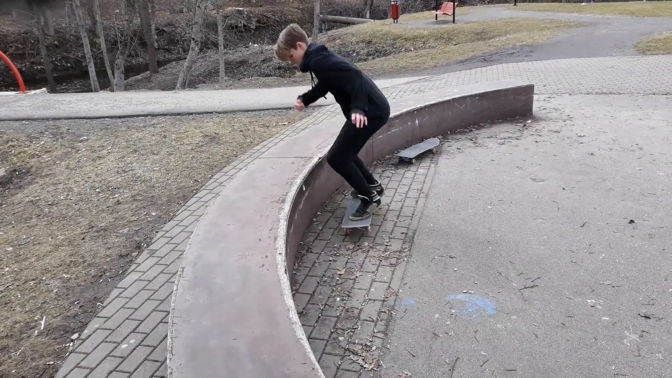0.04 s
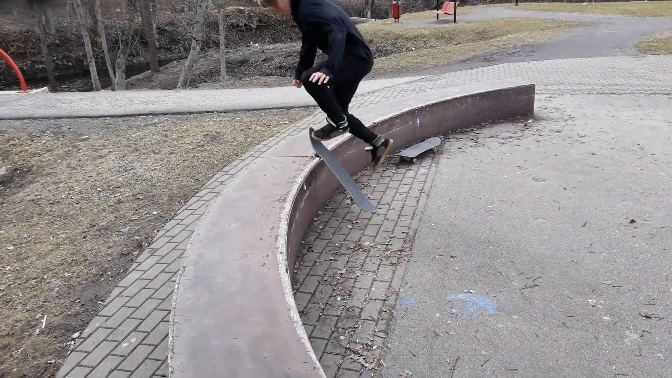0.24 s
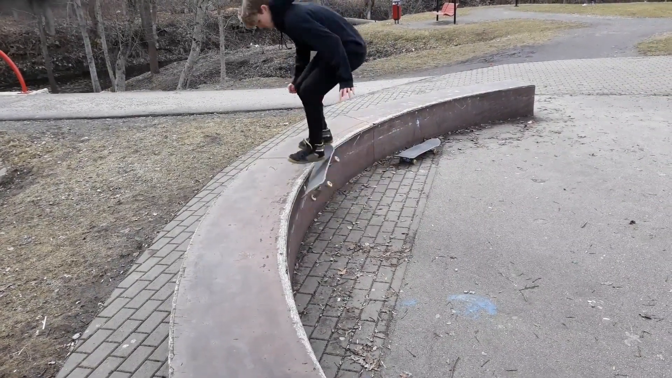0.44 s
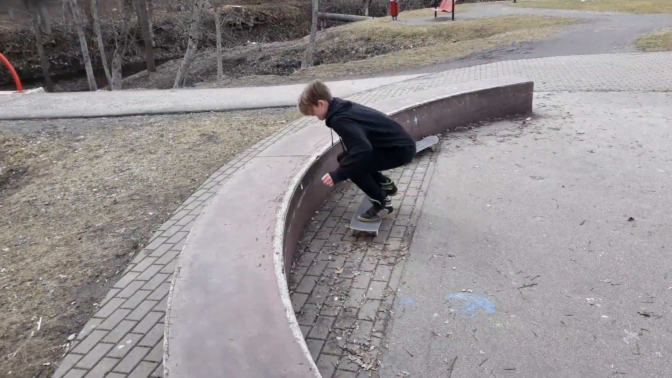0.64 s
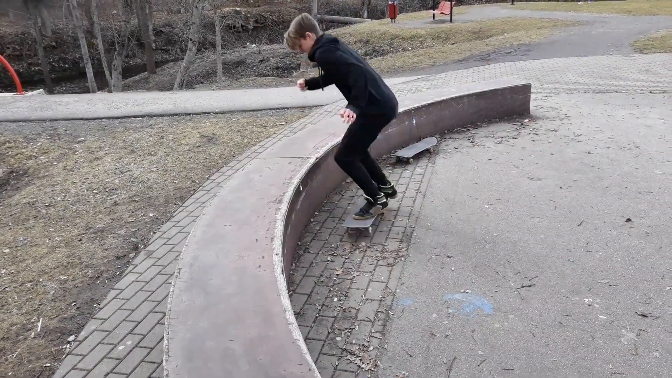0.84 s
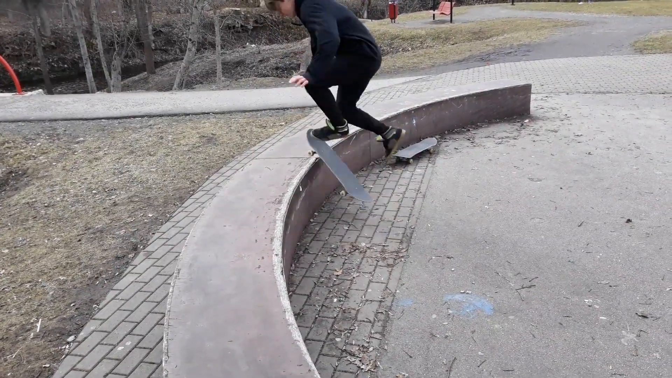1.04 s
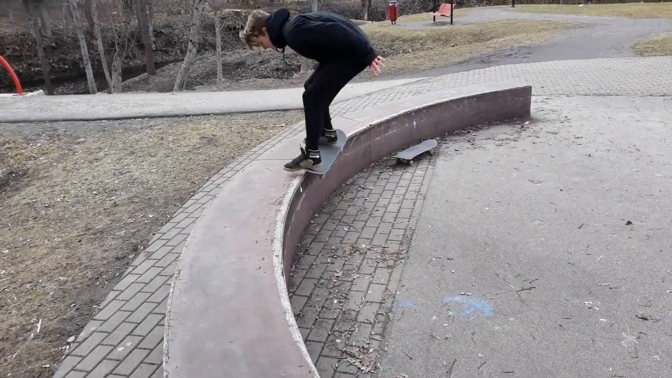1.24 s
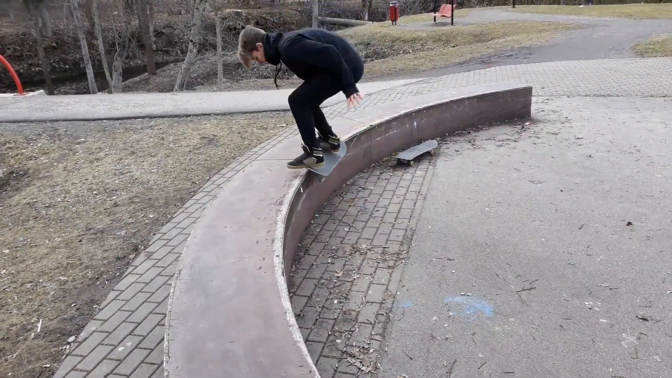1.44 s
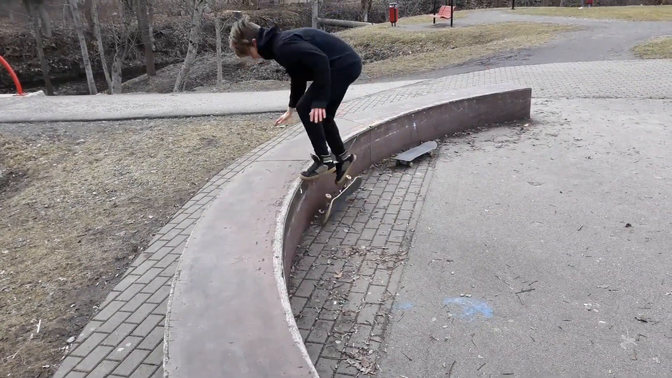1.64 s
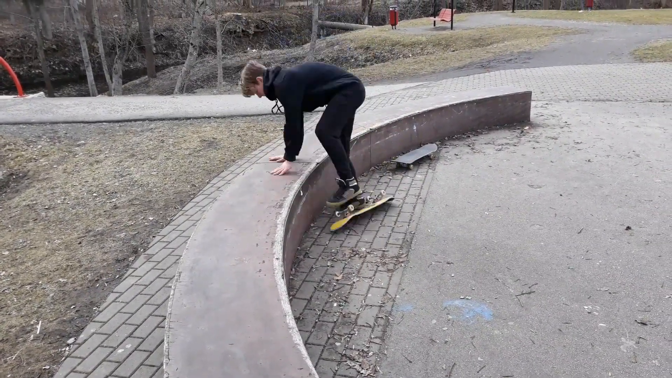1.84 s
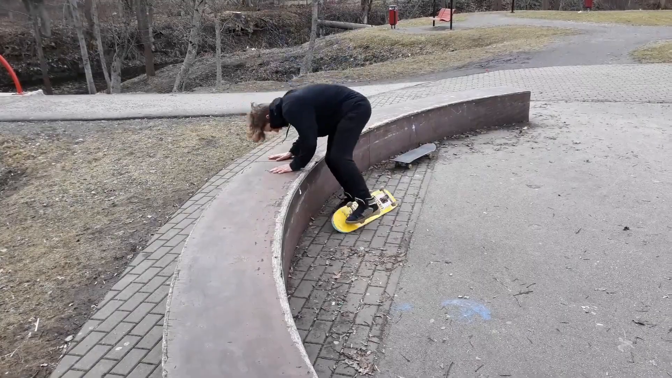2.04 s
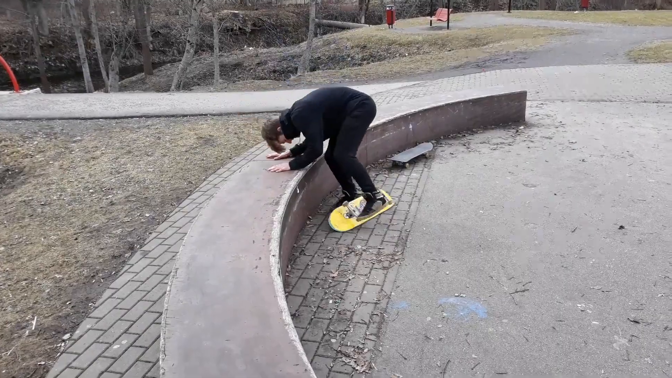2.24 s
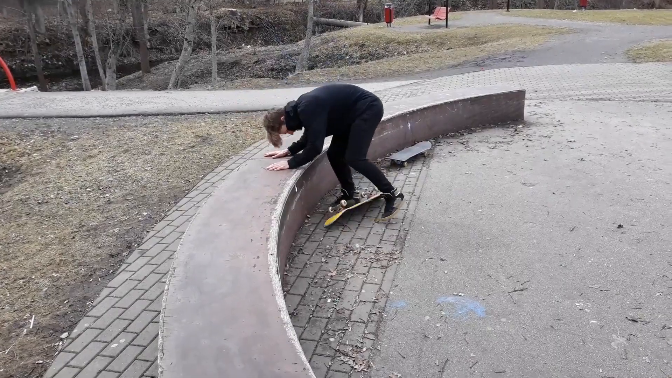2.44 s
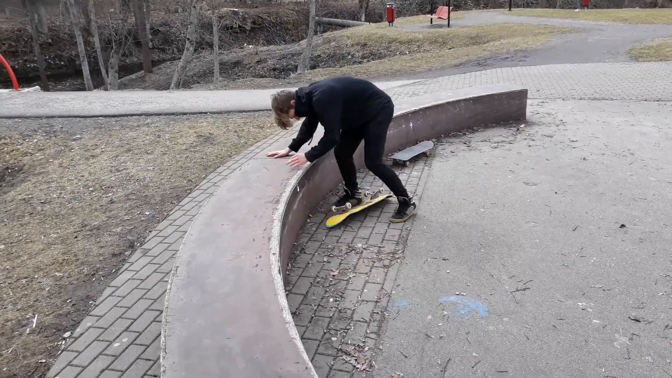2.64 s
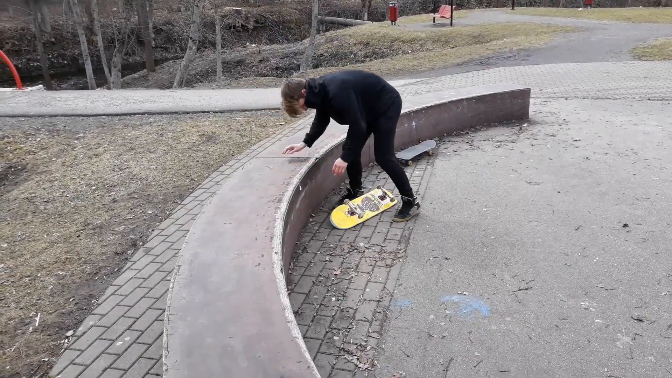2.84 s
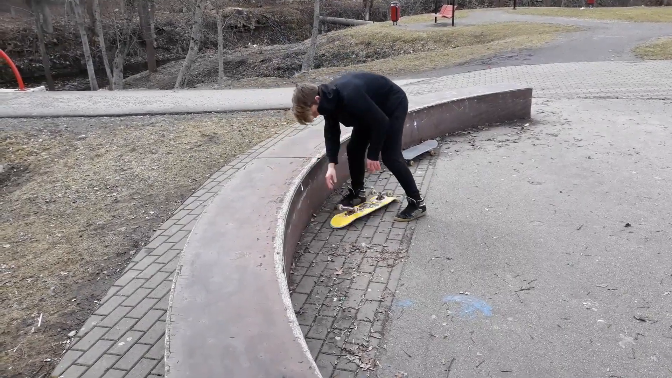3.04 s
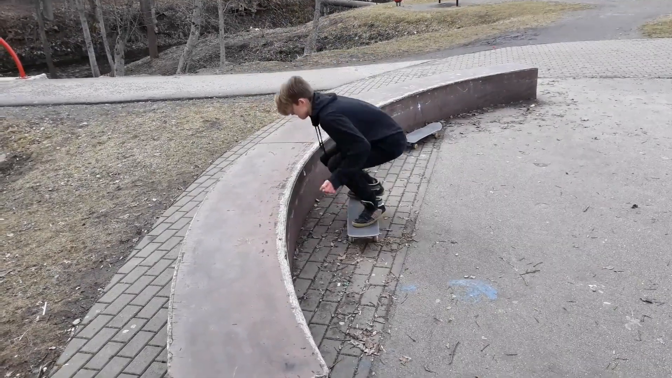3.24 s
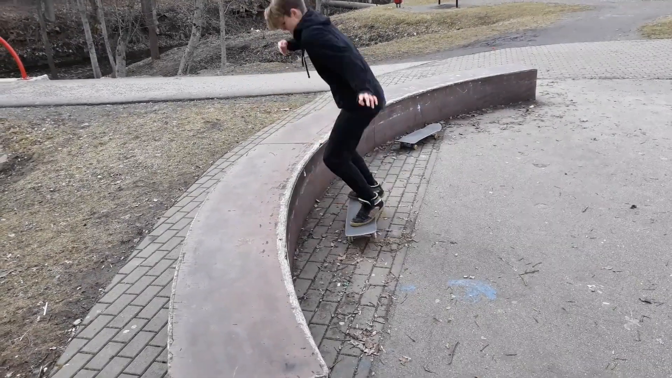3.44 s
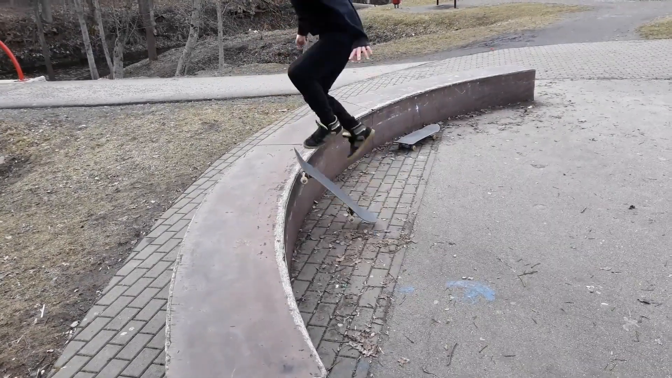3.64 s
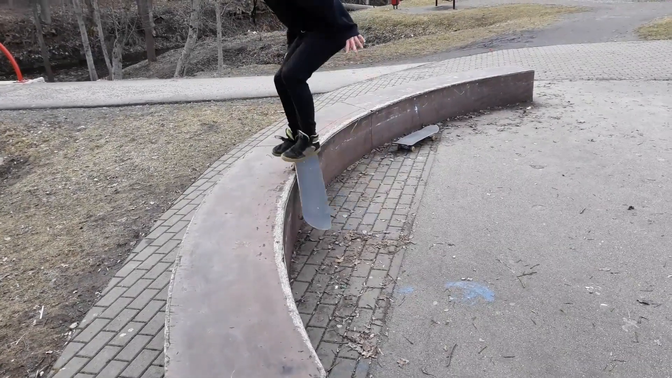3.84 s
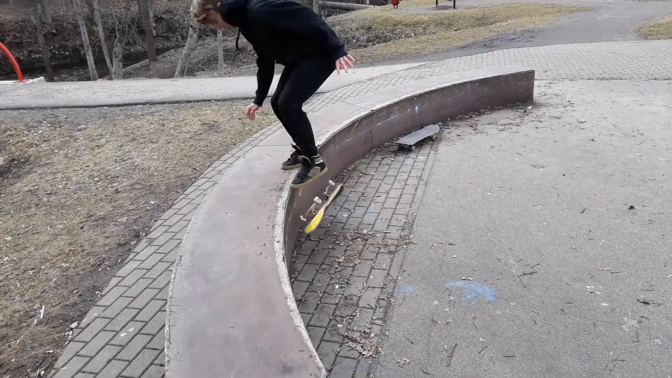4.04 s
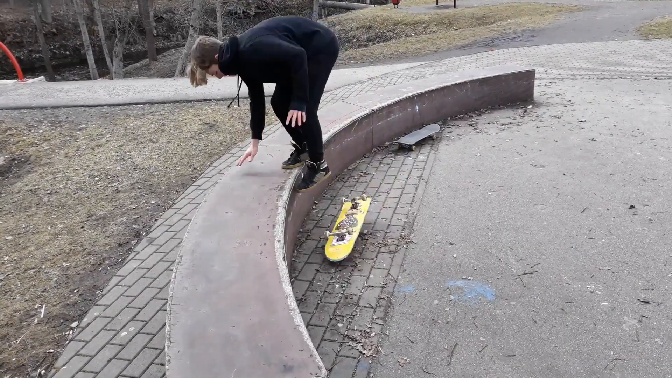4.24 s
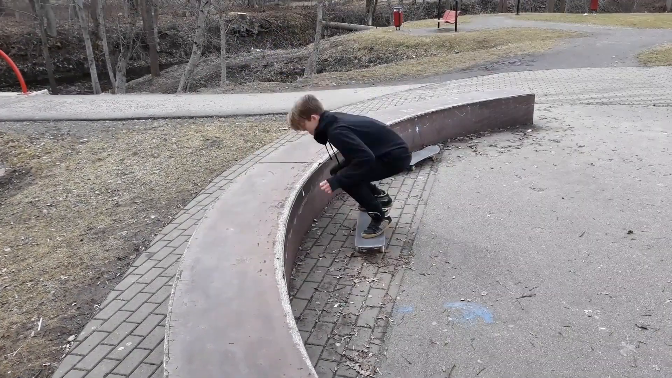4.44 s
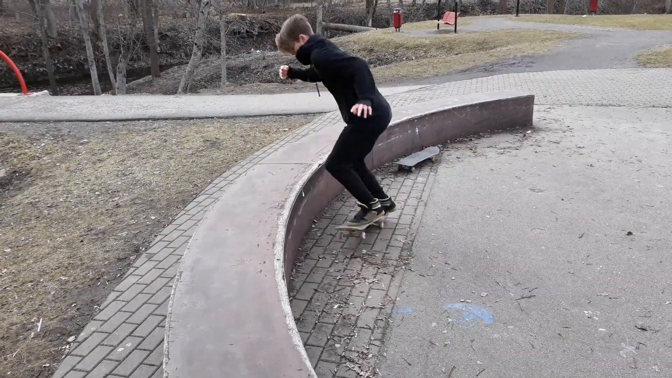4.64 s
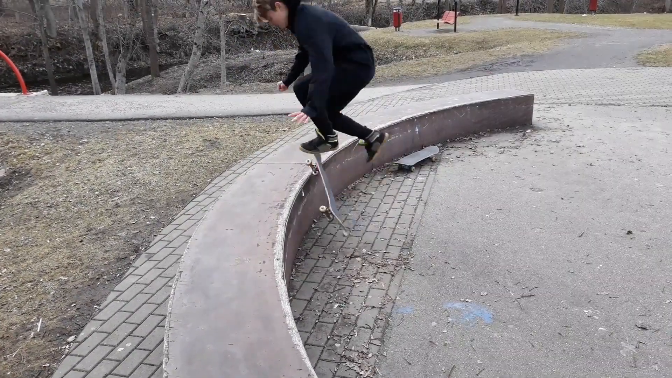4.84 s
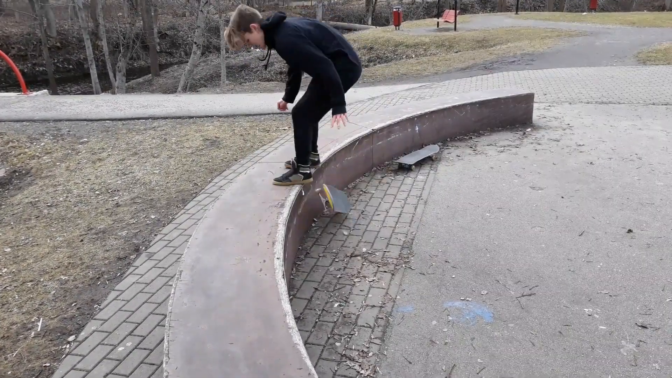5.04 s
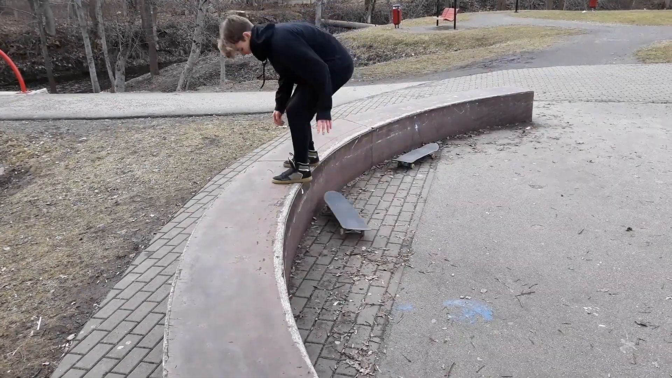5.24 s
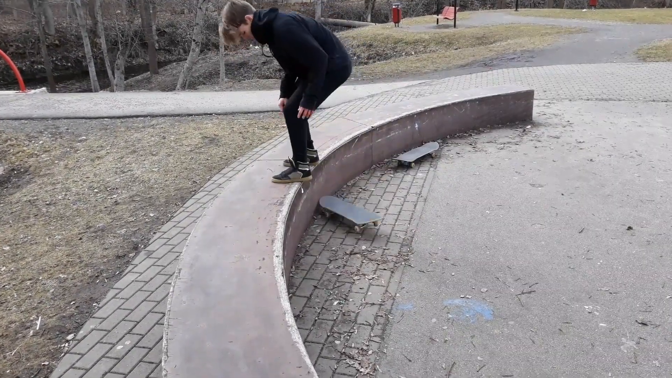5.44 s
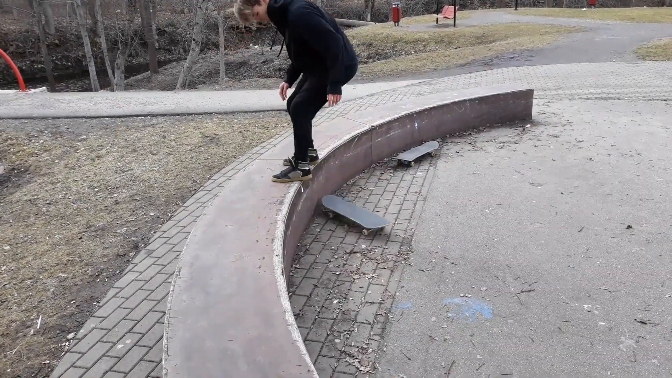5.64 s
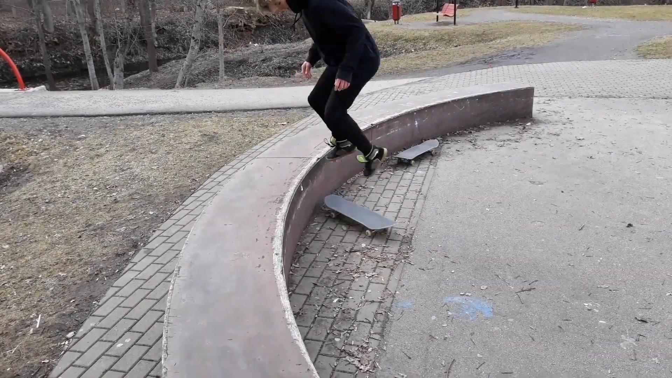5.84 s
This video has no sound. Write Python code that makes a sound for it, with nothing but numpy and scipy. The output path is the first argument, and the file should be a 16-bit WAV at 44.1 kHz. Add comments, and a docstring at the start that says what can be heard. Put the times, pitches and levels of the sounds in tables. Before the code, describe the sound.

A skateboard knocks against a concrete ledge and paving, fairly close, with a slight short echo over soft outdoor air. The tail cracks at 0.3 seconds, and a hollow, rattling landing at 0.6 cuts off abruptly. A gritty scuff leads into another sharp pop at 1.1, followed by wooden knocks and scrapes. A shoe squeaks briefly at 1.6, then the deck thuds, cracks and slams down loudly at about 2 seconds. The air drops away, leaving only faint taps, and returns at 3.1 with light scuffs. A pop at 3.7 starts a second burst, with deck thuds, scrapes and a loud ringing clatter around 4.3. A short, faint creak at 4.6 precedes another pop at 4.8 and heavy hollow knocks until 5.2. The board then settles in weakening taps and small metal rattles until about 5.8 seconds.

```python
"""Skateboard on a concrete ledge

A board is popped against a curved ledge several times, over the outdoor air of a park.
Impacts of tail, trucks and wheels excite short resonances (cracks) and the bending modes of the
plywood deck (booms), and shake loose hardware. Friction makes the soles scuff and squeak,
the wheels skid and a bushing creak. Wall and paving scatter a brief echo."""
import sys
import numpy as np
from scipy import signal
from scipy.fft import rfft, irfft
from scipy.io import wavfile
from scipy.ndimage import uniform_filter1d, minimum_filter1d

SR = 44100
rng = np.random.default_rng(int(sys.argv[2]) if len(sys.argv) > 2 else 0)


def waveform_to_disk(signal):
    """Save audio, clipped to [-1, 1], as 16-bit WAV at the path in sys.argv[1]."""
    frames = np.transpose(np.atleast_2d(signal))
    scaled = np.clip(frames, -1, 1) * 32767
    samples = np.round(scaled).astype(np.int16)
    wavfile.write(sys.argv[1], SR, samples)


N = 260631
CUTOFF_S = .648  # everything that sounds before here stops abruptly

# Hard contacts with the concrete. Each row: start in seconds, level in dB, clearest ring in Hz,
# treble lift above 4 kHz in dB, chatter t60 in seconds.
CONTACTS = [(.273, -1, 2100, -6, .055), (.283, -9, 1450, 26, .05), (.312, -4, 1250, 3, .035),
            (.576, -11, 1340, 5, .07), (.587, -4, 1350, 14, .06), (.614, -15, 1310, 11, .1),
            (1.061, 1.5, 1400, 17, .066), (1.093, -13, 1990, 3, .04), (1.126, -11, 1250, 9, .17),
            (1.307, -11, 1410, -6, .085), (1.344, -15, 1450, -3, .054), (1.353, -14, 1230, 12, .14),
            (1.398, -10, 1340, -8, .022), (1.53, -22, 1400, -10, .025), (1.643, -7, 1080, 11, .066),
            (1.712, -15, 1450, 6, .027), (1.751, 0, 2070, -30, .12), (1.764, -10, 1920, -13, .03),
            (1.842, -17, 1200, -16, .035), (1.868, -30, 3900, 14, .03), (1.926, -22, 1990, 4, .08),
            (1.948, -24, 3000, 4, .05), (1.964, 1.5, 1965, 0, .045), (1.986, -7, 1960, -2.5, .05),
            (2.02, -7, 1970, -12, .05), (2.054, -13, 1890, -9, .033), (2.073, -17, 1140, -5, .09),
            (2.461, -39, 1360, 3, .17), (2.493, -36, 1055, 8, .1), (2.539, -27, 2000, -3, .024),
            (2.833, -30, 1100, 6, .05), (3.122, -24, 1870, 7, .02), (3.668, -16, 1160, 13, .04),
            (3.709, -4, 1900, 9, .07), (3.808, -9, 800, 14, .05), (3.973, -9, 1220, -4, .12),
            (4.017, -11, 1400, 5, .06), (4.033, -8, 1370, -2, .12), (4.084, -1.5, 1990, -12, .04),
            (4.231, -7, 1475, -3, .14), (4.236, -5, 1060, -14, .04), (4.266, 2.5, 2040, 4, .1),
            (4.275, -5, 1890, 0, .05), (4.291, -5, 2010, -3, .085), (4.445, -15, 1760, -6, .09),
            (4.819, .6, 1940, -4, .04), (4.829, -7, 4200, 14, .03), (4.893, -4, 1700, 5, .11),
            (5.029, -3, 1470, 3, .15), (5.117, -16, 1400, 0, .034), (5.147, -16, 1270, -15, .05),
            (5.159, -16, 3780, 0, .02), (5.183, -3, 1220, 14, .045), (5.314, -11, 1890, -6, .045),
            (5.334, -15, 1380, -12, .04), (5.357, -10, 1420, -3, .04), (5.403, -20, 1405, 6, .03),
            (5.452, -28, 1400, 16, .06), (5.509, -17, 1325, 0, .06), (5.604, -22, 1320, 9, .13),
            (5.718, -26, 1300, 14, .085), (5.792, -29, 1360, 14, .074)]


def amp(db):
    return 10 ** (np.asarray(db) / 20)


def unit_rms(x):
    return x / np.sqrt(np.mean(x ** 2) + 1e-20)


def add(mix, start, sound):
    """Superposition: mixes a sound in; one begun before CUTOFF_S cannot ring past it."""
    if start < CUTOFF_S:
        sound = sound[:round((CUTOFF_S - start) * SR)]
    part = mix[round(start * SR):][:len(sound)]
    part += sound[:len(part)]


def park_air():
    """Spectrally shaped noise with faint random patches; level and rumble change in steps."""
    # Spectrum of the air. Each row: frequency in Hz, relative spectral density in dB.
    spectrum = [(24, -49.5), (40, -13), (85, -2.5), (292, -0.5), (1050, -7.5), (1830, -3), (2540, -15),
                (3430, -11.5), (5140, -25.5), (6280, -25), (8700, -30), (11000, -45), (15200, -48.5),
                (16300, -66)]
    # Steps in the air. Each row: start in seconds, level in dB, rumble lift in dB.
    steps = [(0, -40, -2), (.648, -41.5, 0), (2.0, -57.5, 0), (3.114, -40.5, 0), (4.48, -39.5, 2),
             (5.2, -48, 0)]
    frames, hz = N // 256 + 5, np.fft.rfftfreq(1024, 1 / SR)
    real, imag, patches = rng.standard_normal((frames, 513, 3)).T
    patch_db = unit_rms(uniform_filter1d(uniform_filter1d(patches, 12, 0), 14, 1))
    knot_hz, knot_db = np.transpose(spectrum)
    shape_db = np.interp(np.log(hz + 1), np.log(knot_hz), knot_db)
    spectra = (real + 1j * imag) * amp(shape_db[:, None] + patch_db)
    starts, level_db, rumble_db = np.transpose(steps)
    frame_step = np.searchsorted(starts[1:], np.arange(frames) * 256 / SR)
    spectra *= amp(rumble_db[frame_step] / (1 + (hz[:, None] / 300) ** 2))
    noise = signal.istft(spectra, nperseg=1024, noverlap=768)[1][:N]
    step = np.searchsorted(starts, np.arange(N) / SR, "right") - 1
    return amp(level_db[step]) * unit_rms(noise)


def ledge_echo(sound, t60=.28):
    """Scattering off the curved wall and paving: sparse reflections whose treble dies first."""
    taps = np.zeros(SR // 2)
    slots = np.arange(300, len(taps) - 20, 20)
    taps[slots + rng.integers(0, 20, len(slots))] = rng.choice([-1., 1.], len(slots))
    hz, t, spectra = signal.stft(taps, SR, nperseg=256)
    decay = amp(-60 * t / t60 * (.5 + hz[:, None] / 5000))  # t60 holds at 2.5 kHz
    tail = signal.istft(spectra * decay * (hz[:, None] > 0), SR, nperseg=256)[1]
    return signal.fftconvolve(sound, tail / np.linalg.norm(tail))[:N]


def hardware_rattles(t60=.15, ticks_per_s=350):
    """Repeated collisions: loose washers and bearings tick over a thin fizz, then settle."""
    # Shakes from blows to the board. Each row: start in seconds, level in dB.
    shakes = [(.587, -39), (1.128, -46), (1.31, -46), (1.396, -51), (1.77, -46), (3.636, -50), (3.808, -44),
              (4.3, -44), (4.9, -45), (5.04, -46), (5.19, -46), (5.333, -51), (5.357, -49), (5.403, -46),
              (5.604, -52), (5.718, -52), (5.79, -57)]
    # Resonances of the metal. Each row: frequency in Hz, width in Hz, gain in dB.
    metal_modes = [(6500, 1800, 0), (8600, 1400, -1), (11000, 3000, -16), (15300, 1100, -15)]
    out, t = np.zeros(N), np.arange(8192) / SR
    hz = np.fft.rfftfreq(len(t), 1 / SR)
    mode_hz, width, mode_db = np.transpose(metal_modes)[:, :, None]
    metal = (amp(mode_db) / (1 + 2j * (hz - mode_hz) / width) ** 2).sum(0)
    settle = amp(-60 * t / t60) * (.8 + .7 * np.exp(-t / .006))
    for start, db in shakes:
        ticks = rng.standard_normal(len(t)) * (.11 + (rng.random(len(t)) < ticks_per_s / SR))
        add(out, start, amp(db) * settle * unit_rms(irfft(rfft(ticks) * metal)))
    return out


def ring_response(hz, centre_hz, treble_db, spread_db):
    """Damped resonators in parallel; low ones weaken with distance from the contact's favoured pitch."""
    # Short rings of ply, trucks and kerb. Each row: frequency in Hz, bandwidth in Hz, gain in dB.
    resonances = [(775, 203, 2.5), (1030, 110, 2.5), (1251, 218, -0.5), (1565, 213, -3.5), (1862, 172, 0),
                  (2135, 274, 0), (3090, 650, -9.5), (3740, 484, -13), (4184, 474, -20), (5500, 850, -23.5),
                  (6340, 1700, -29.5), (8760, 780, -31.5), (11500, 3000, -57.5), (15200, 1200, -72.5)]
    mode_hz, width, db = np.transpose(resonances)
    near_db = -7.5 * np.log2(np.minimum(mode_hz, 2500) / np.minimum(centre_hz, 2500)) ** 2
    db = db + near_db + treble_db * np.clip(np.log2(mode_hz / 2000), 0, 1) + spread_db
    signs = (-1) ** np.arange(len(mode_hz))
    modes = (signs * amp(db))[:, None] / (1 + 2j * (hz - mode_hz[:, None]) / width[:, None])
    return modes.sum(0) / (1 + 400 / (1j * hz + 1)) / (1 + 1j * hz / 8200) ** 2


def scrapes(swell_share=.4):
    """Sliding friction: dense grit clicks of uneven size drive the short rings, swelling and fading."""
    # Soles rasping on grip tape and wheels skidding. Each row: start and length in seconds,
    # level and brightness in dB.
    slides = [(.505, .06, -36, 3), (.92, .13, -33, 8), (.99, .058, -25, 12), (1.09, .2, -42, -5),
              (1.31, .11, -31, 6), (1.76, .25, -36, -9), (1.97, .28, -46, 3), (3.29, .1, -43, 18),
              (3.5, .14, -44, 18), (3.94, .09, -27, 7), (4.02, .09, -26, 15), (4.27, .16, -27, 1.5),
              (4.7, .07, -37, 15), (4.76, .07, -25, 13), (5.187, .13, -34, -5.5), (5.31, .2, -40, -5)]
    out, size = np.zeros(N), 16384
    hz, t = np.fft.rfftfreq(size, 1 / SR), np.arange(size) / SR
    for start, length, db, bright_db in slides:
        grit = rng.standard_normal(size) * amp(3 * np.minimum(rng.exponential(1, size), 4))
        grit *= rng.random(size) < .2
        grip = unit_rms(uniform_filter1d(rng.standard_normal(size), size=200))  # catches and lets go
        body = ring_response(hz, 1700 * 2 ** (bright_db / 15), bright_db, 0)
        rasp = unit_rms(irfft(rfft(grit * amp(2.5 * grip)) * body))
        swell = np.interp(t / length, [0, swell_share, 1], [0, 1, 0]) ** 1.22
        add(out, start, amp(db) * rasp * swell)
    return out


def stick_slip(length, first_hz, last_hz, db, harmonics_db, wobble):
    """Stick-slip oscillation: a gliding harmonic series, unsteady in pitch and strength."""
    count = round(length * SR)
    drifts = uniform_filter1d(uniform_filter1d(rng.standard_normal((2, SR // 4)), size=120), size=60)
    shake, grip = (unit_rms(drift)[:count] for drift in drifts)
    cycles = np.cumsum(np.linspace(first_hz, last_hz, count) * (1 + wobble * shake)) / SR
    tone = sum(gain * np.cos(2 * np.pi * k * cycles) for k, gain in enumerate(amp(harmonics_db), 1))
    return amp(db + 1.5 * grip) * unit_rms(tone) * signal.windows.tukey(count, .45)


def squeaks_and_creak():
    """Stick-slip friction in rubber: soles squeak and a loaded bushing creaks."""
    # Sole slips. Each row: start and length in seconds, first and last pitch in Hz, level in dB.
    slips = [(.512, .03, 1430, 1425, -37), (1.571, .027, 890, 950, -20), (1.595, .024, 965, 1005, -20),
             (1.618, .03, 1000, 1050, -27), (3.01, .06, 822, 850, -51), (3.3, .07, 860, 890, -45)]
    # Relative levels of a squeak's harmonics in dB, from the fundamental up.
    harmonics_db = [0, 11, -7, -6, -16, -27]
    # One slip of the bushing, with the same columns as a sole slip.
    creak = (4.605, .105, 194, 345, -35)
    out = np.zeros(N)
    for start, *slip in slips:
        add(out, start, stick_slip(*slip, harmonics_db, wobble=.02))
    add(out, creak[0], stick_slip(*creak[1:], harmonics_db=[0, -18], wobble=.01))
    return out


def deck_notes():
    """Free vibration: after some blows a single deck mode rings on as a damped sinusoid."""
    # Clear notes. Each row: start in seconds, frequency in Hz, level in dB, t60 in seconds.
    notes = [(3.71, 1217, -13, .05), (4.267, 3230, -11, .04), (4.276, 1040, -8, .075),
             (4.276, 1580, -11, .09), (4.82, 1065, -11, .04), (5.187, 990, -16, .12)]
    out, t = np.zeros(N), np.arange(8192) / SR
    for start, hz, db, t60 in notes:
        add(out, start, amp(db - 60 * t / t60) * np.sin(2 * np.pi * hz * t) * np.minimum(t / .002, 1))
    return out


def deck_booms(damping=1.5, knock_db=-18, knock_tilt_db=6):
    """Modal vibration: a blow bends the deck, and where it lands favours the low or the high modes."""
    # Soft blows. Each row: start in seconds, level in dB, tilt up to 400 Hz in dB per octave.
    blows = [(.309, -2.5, -2.5), (.575, -8, -2), (.583, 0, 1.5), (1.126, -3, 5), (1.3, -7.5, -1),
             (1.343, -12.5, -2.5), (1.643, -1, -1), (1.664, -4.5, -1), (1.709, -19, -4), (3.662, -17, -3),
             (3.728, -18, -11), (3.804, -14, -1), (3.828, -18, -12), (3.945, -14, -12), (4.017, -3, -9),
             (4.04, -12, 0), (4.094, -1.5, -1.5), (4.229, -16, 9.5), (4.285, -14, 7), (4.764, -21, 6),
             (4.893, -.6, -2), (4.909, -4.5, 4), (4.922, -12.5, 1.5), (5.029, -.6, 1.5), (5.044, -11, 3.5),
             (5.064, 0, 1.5), (5.116, -9.5, -7.5), (5.508, -14, 1.5)]
    # Bending modes. Each row: frequency in Hz, gain in dB, t60 of the free deck in seconds.
    bending_modes = [(94.5, -20, 0.26), (136.7, -8, 0.29), (168.7, 2.5, 0.14), (211, 0.5, 0.14),
                     (262.7, 3.5, 0.13), (312.5, 8.5, 0.092), (384.7, -3, 0.13), (527.6, -23, 0.092),
                     (718, -25.5, 0.083)]
    out, t = np.zeros(N), np.arange(14000) / SR
    hz, mode_db, free_t60 = np.transpose(bending_modes)[:, :, None]
    decay_db = 60 * t * damping / free_t60  # ground and feet shorten the ring
    knocks = [(start, db + knock_db, knock_tilt_db) for start, db, *_ in CONTACTS]
    for start, db, tilt_db in blows + knocks:
        spot_db = tilt_db * np.log2(np.minimum(hz, 400) / 250)
        spot_db += 2 * rng.standard_normal(hz.shape)  # no two blows land on the same spot
        detune = 1 + .012 * rng.standard_normal(hz.shape)
        boom = (amp(mode_db + spot_db - decay_db) * np.sin(2 * np.pi * hz * detune * t)).sum(0)
        boom *= (1 - np.exp(-t / .0044)) * (1 + .91 * np.exp(-t / .024))  # the first swings are strong, then quickly fall back to the ring
        add(out, start + .004, amp(db) * boom / abs(boom).max())
    # A narrow deck radiates little deep bass.
    return signal.sosfilt(signal.butter(2, 95, "high", fs=SR, output="sos"), out)


def air_thump():
    """Air displacement: the board slams flat and pushes out one low pressure pulse."""
    # The pulse: start in seconds, level in dB, frequency in Hz, width in seconds.
    pulse = (1.964, -14, 85, .004)
    start, db, hz, width = pulse
    out, t = np.zeros(N), np.arange(14000) / SR
    add(out, start, amp(db) * np.sin(2 * np.pi * hz * t) * t / width * np.exp(1 - t / width))
    return out


def contact_cracks():
    """Impact excitation: a snap and the chatter of crushed grit drive the rings and one woody note."""
    out, t = np.zeros(N), np.arange(8192) / SR
    hz = np.fft.rfftfreq(len(t), 1 / SR)
    snap = 1.1 * amp(-60 * t / .012)
    for start, db, ring_hz, treble_db, t60 in CONTACTS:
        chatter = rng.standard_normal(len(t)) * amp(3.5 * rng.standard_normal(len(t)))
        chatter *= (amp(-60 * t / t60) + snap) * np.minimum(t / .001, 1)
        note = amp(4.5) / (1 + 2j * (hz - ring_hz) / (.027 * ring_hz)) / (1 + (hz / 5000) ** 2)
        spread_db = 2.13 * rng.standard_normal(14)  # one gain offset for each short ring
        body = ring_response(hz, ring_hz, treble_db, spread_db)
        crack = irfft(rfft(chatter) * (body + note) / (1 + 1j * hz / 13000))[:-400]
        peak_power = uniform_filter1d(crack ** 2, size=200).max()
        add(out, start, amp(db) * crack / np.sqrt(6.5 * peak_power))
    return out


def scene():
    """Superposition of direct sound, echo and air; the first echo also stops at CUTOFF_S."""
    board = contact_cracks() + deck_booms() + air_thump() + deck_notes() + squeaks_and_creak()
    before = np.arange(N) < CUTOFF_S * SR
    echoes = ledge_echo(board * before) * before + ledge_echo(board * ~before)
    return (board + amp(-19) * echoes + scrapes() + hardware_rattles() + park_air())[None]


def record(dry):
    """Peak limiting: a bass cut, a quick gain dip that holds peaks at full scale, then a low-pass."""
    dry = signal.sosfilt(signal.butter(2, 70, "high", fs=SR, output="sos"), dry)
    gain = minimum_filter1d(1 / np.maximum(abs(dry), 1), size=161)
    limited = dry * uniform_filter1d(gain, size=81)
    low_pass = signal.firwin(511, 16400, window=("kaiser", 9), fs=SR)
    return signal.oaconvolve(limited, low_pass[None], "same")


dry = scene()
out = record(dry)
waveform_to_disk(out)
```